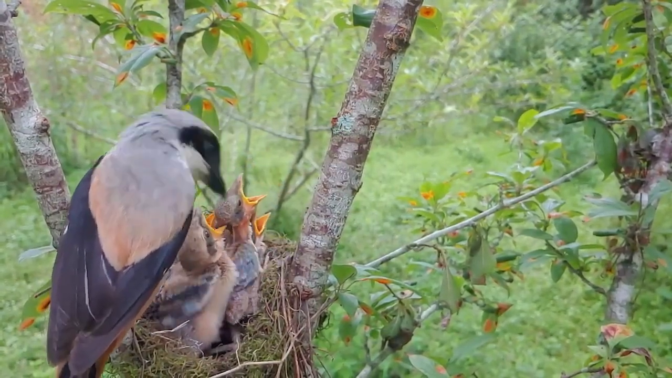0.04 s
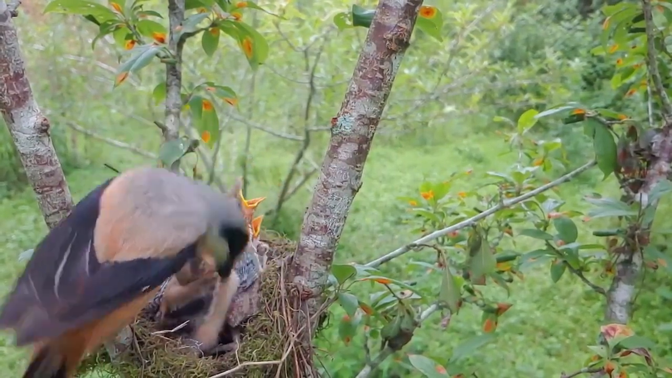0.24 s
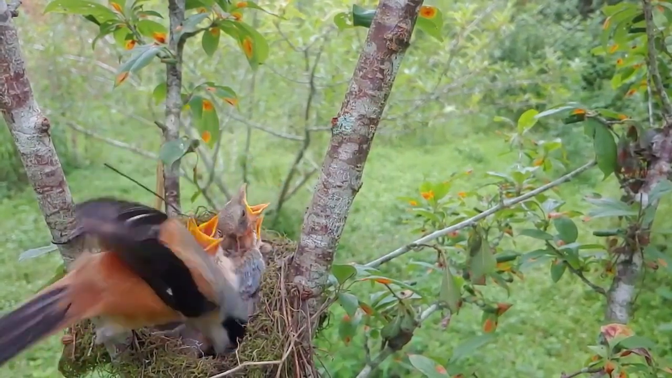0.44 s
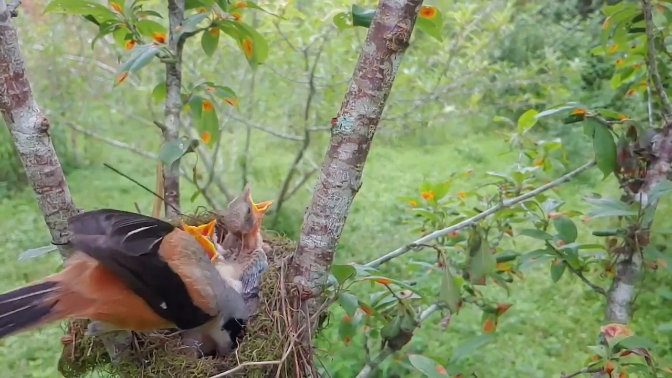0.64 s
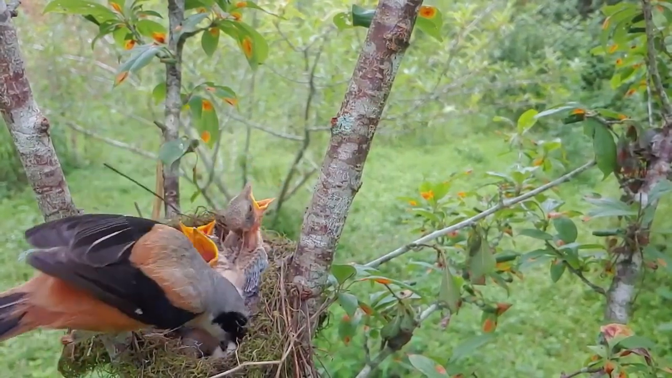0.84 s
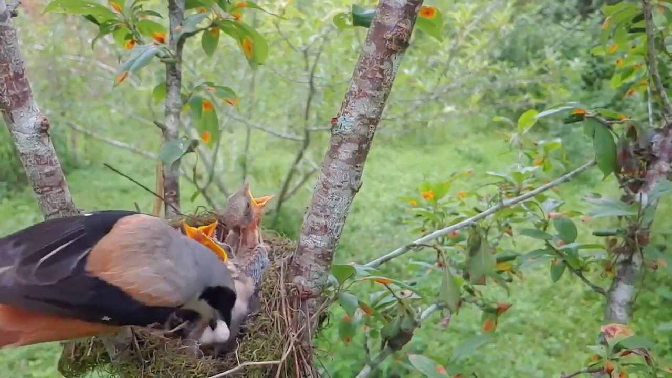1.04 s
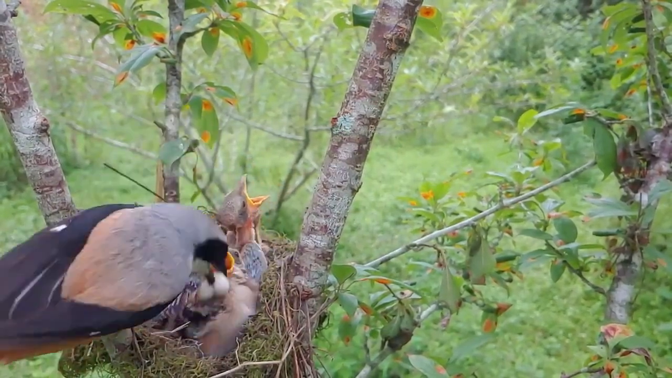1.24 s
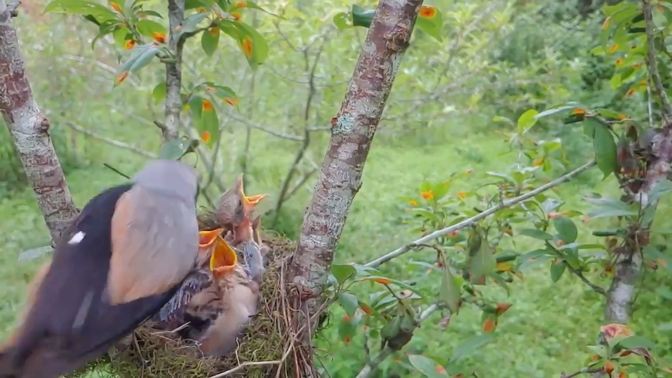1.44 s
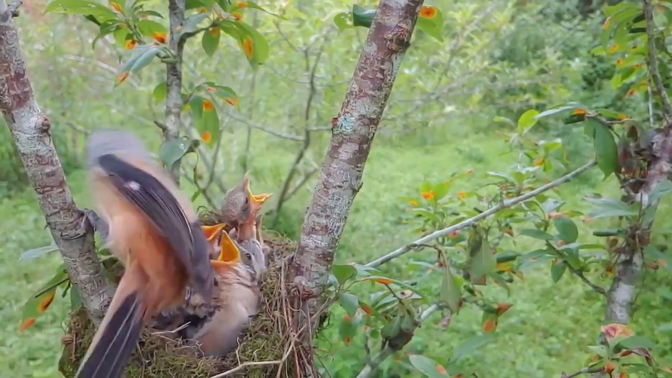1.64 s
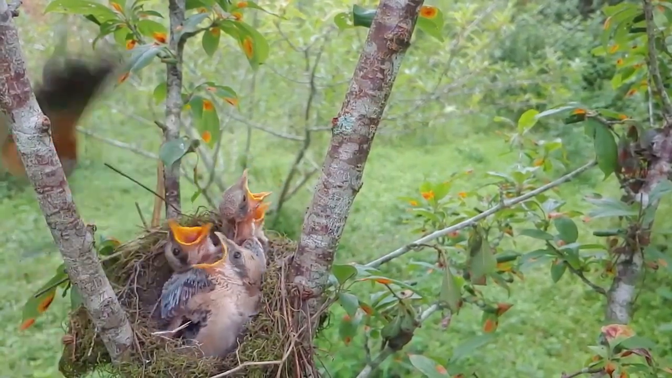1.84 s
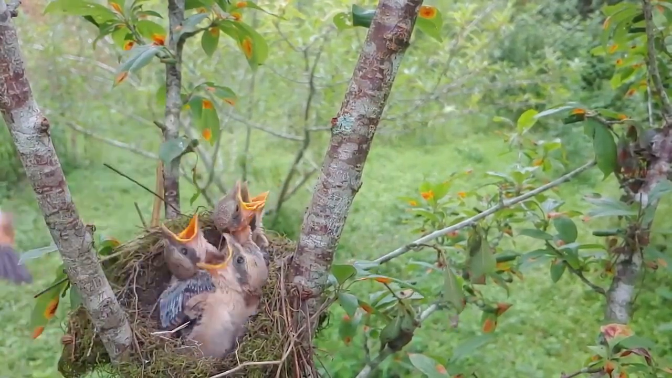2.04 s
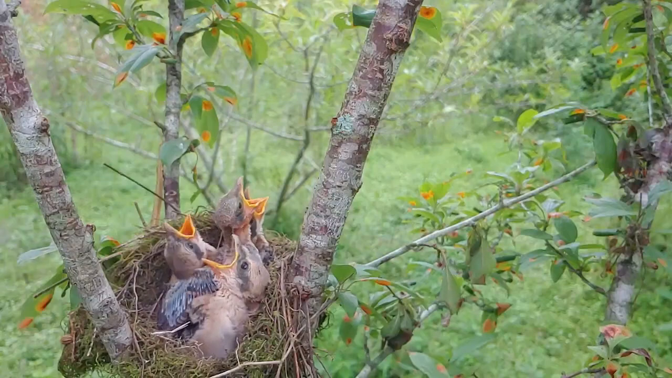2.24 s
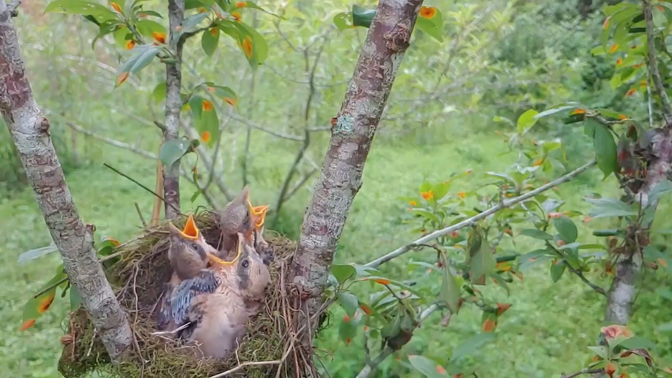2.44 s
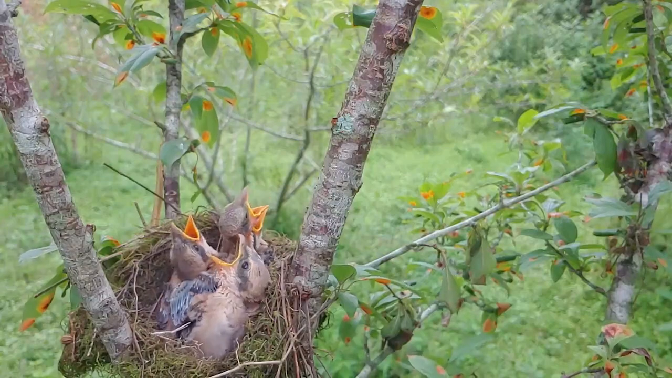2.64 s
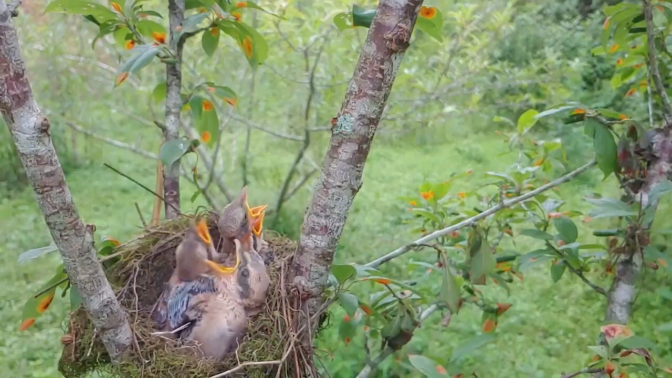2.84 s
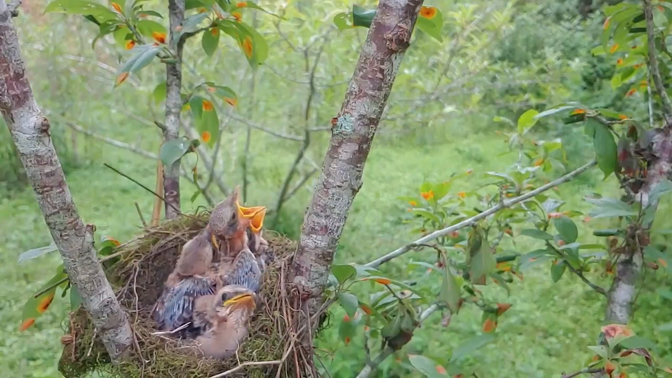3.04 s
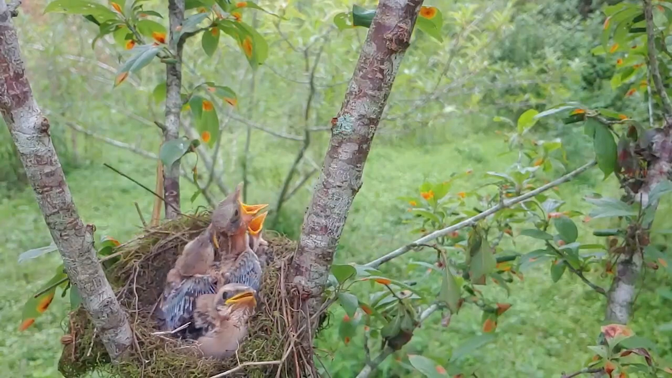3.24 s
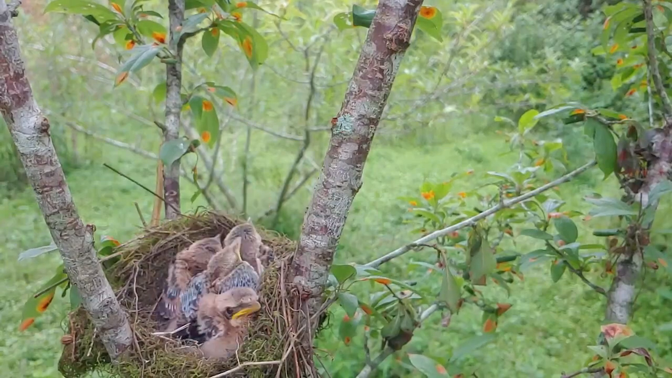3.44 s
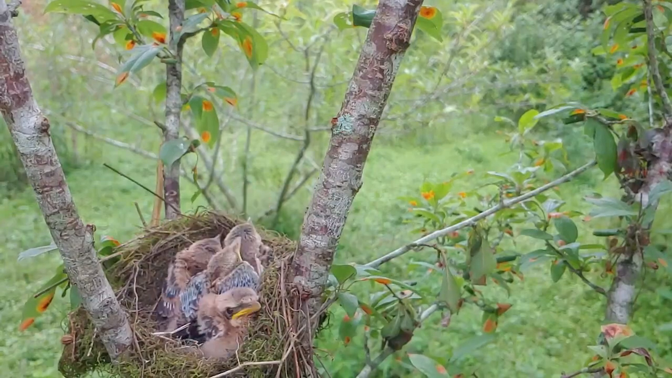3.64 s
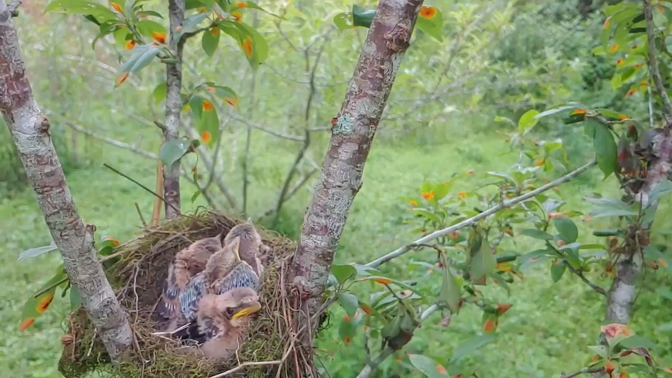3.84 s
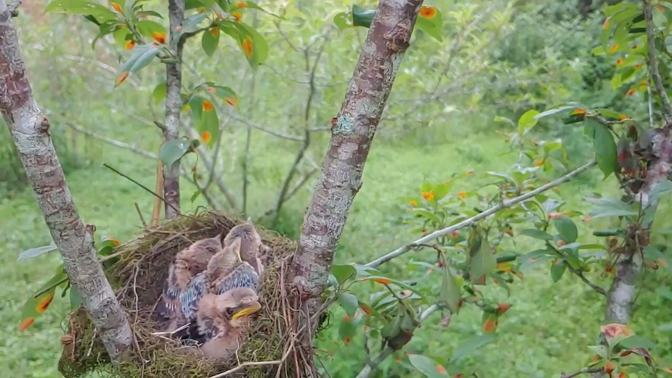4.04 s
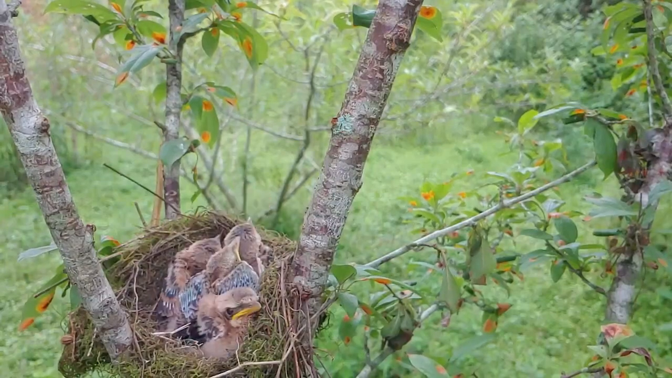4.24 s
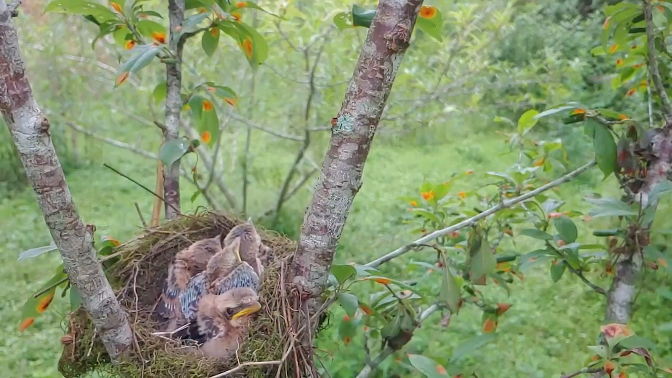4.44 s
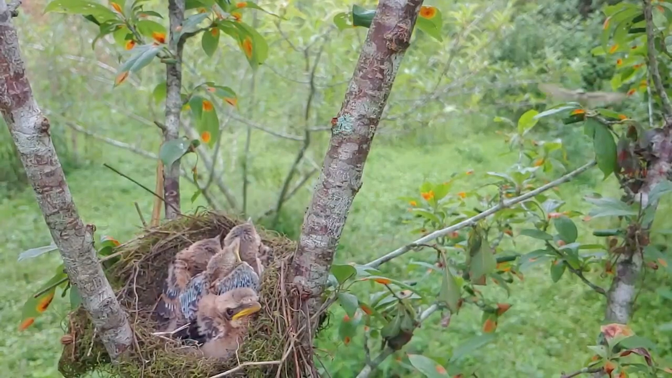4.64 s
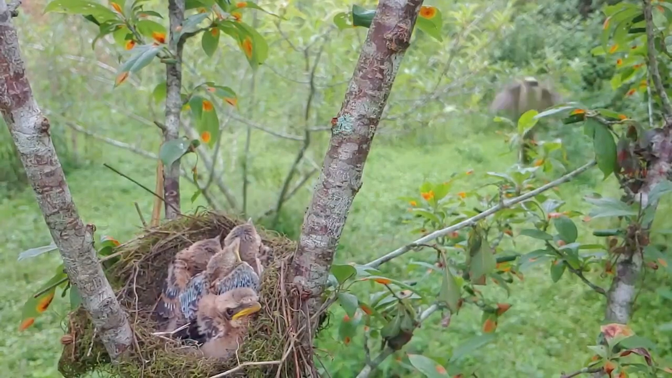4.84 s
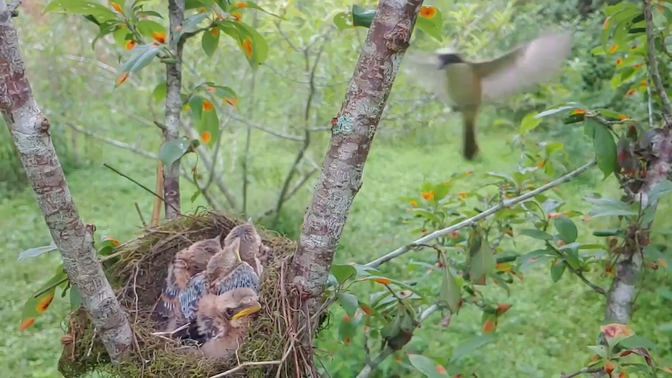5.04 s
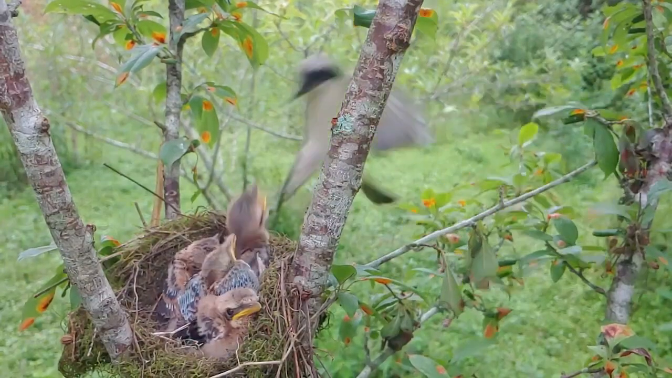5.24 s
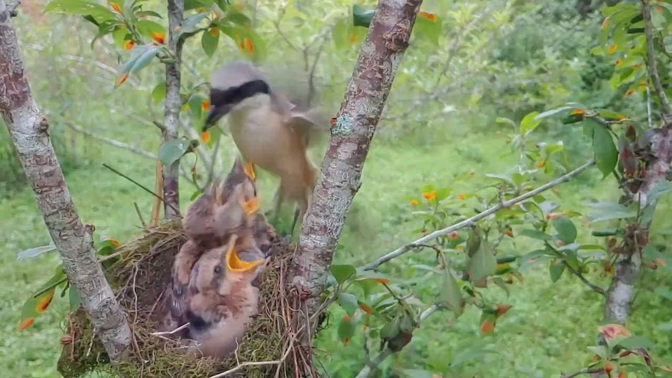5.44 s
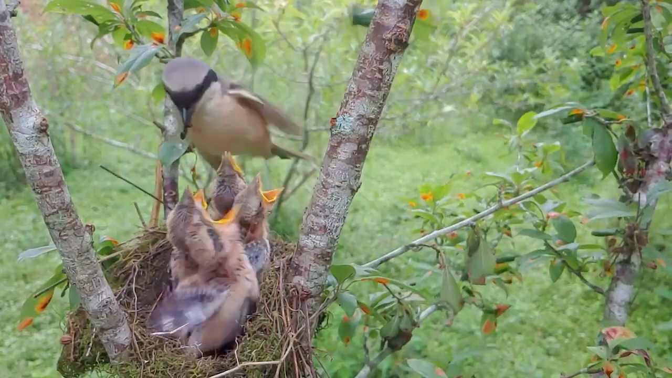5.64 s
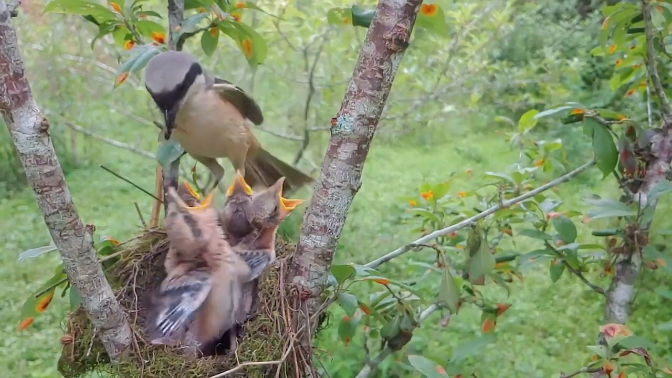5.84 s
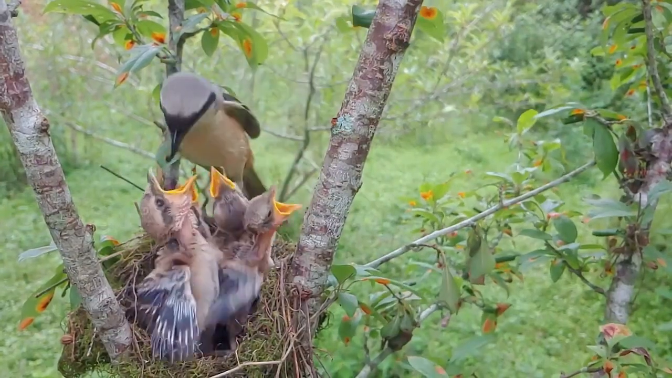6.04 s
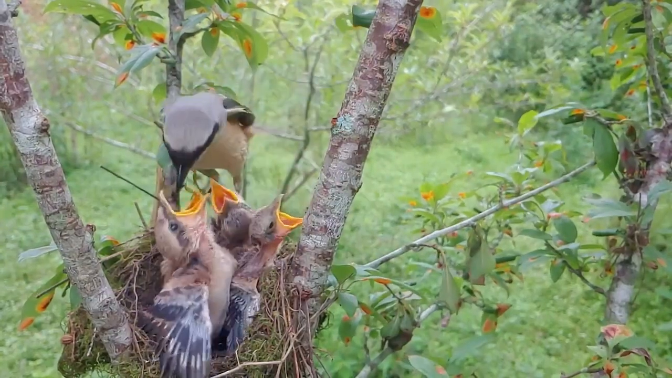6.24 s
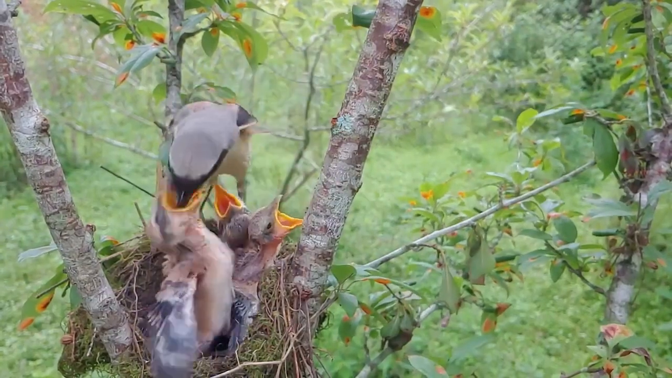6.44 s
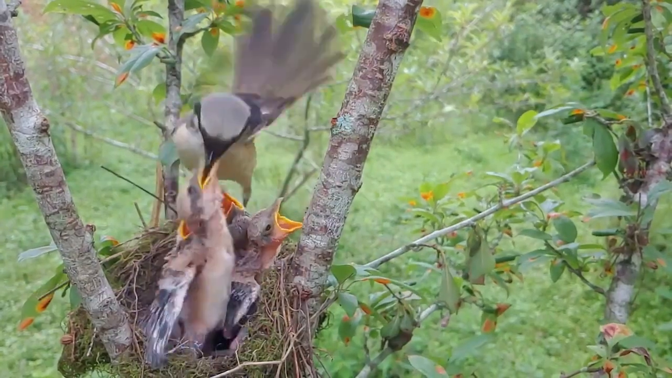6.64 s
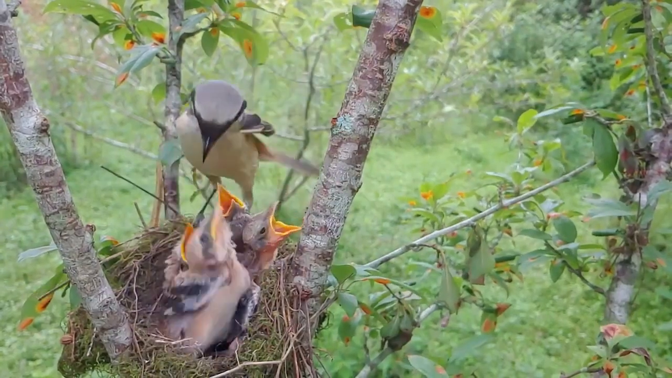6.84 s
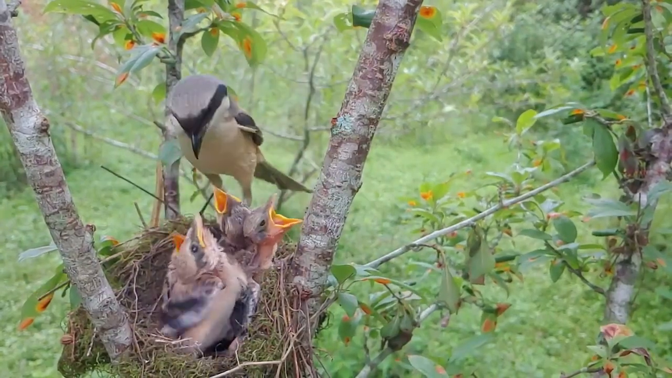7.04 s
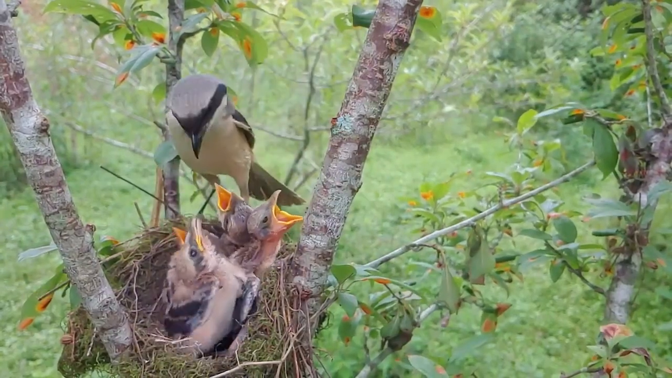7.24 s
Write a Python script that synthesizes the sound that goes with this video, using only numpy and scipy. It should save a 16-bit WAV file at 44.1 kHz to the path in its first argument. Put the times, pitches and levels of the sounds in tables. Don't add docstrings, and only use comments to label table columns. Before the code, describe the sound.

Close overlapping chick begging, squeaky and breathy, falls silent over faint chirring insects, then restarts more eagerly after a soft flapping landing.

```python
import sys
import numpy as np
from scipy import signal
from scipy.fft import rfft, irfft, next_fast_len
from scipy.io import wavfile
from scipy.ndimage import uniform_filter1d, map_coordinates

SR = 44100
rng = np.random.default_rng(int(sys.argv[2]) if len(sys.argv) > 2 else 0)


def dump_mix(stems):
    frames = np.atleast_2d(stems).T
    limited = np.clip(frames, -1, 1)
    pcm = np.round(limited * 32767).astype(np.int16)
    wavfile.write(sys.argv[1], SR, pcm)


def linear_from_db(decibels):
    return 10 ** (np.asarray(decibels, float) / 20)


N = 321930

# frequency in Hz, density in dB per Hz.
AIR_HZ_DB = [(20, -10), (59, -8), (598, -18), (1770, -27.5), (4700, -22.5), (5900, -17), (9500, -17),
             (11500, -15.5), (12500, -28)]
# frequency in Hz, likeness from 0 to 1.
AIR_ALIKE = [(30, .55), (300, .36), (2000, .2), (8000, .15)]
# start in seconds, length in seconds, start pitch in Hz, end pitch in Hz, level in dB.
FAR_BIRDS = [(3.56, 0.086, 4450, 4550, -70), (3.87, 0.027, 3140, 2820, -66), (4.09, .014, 3320, 2700, -68),
             (4.138, 0.02, 2710, 3270, -64), (4.18, .026, 3150, 3160, -64), (4.268, 0.022, 3200, 2800, -61),
             (4.312, 0.022, 2980, 2850, -66), (4.335, .01, 2950, 3400, -64),
             (4.458, 0.012, 2880, 3250, -62), (4.465, 0.021, 3440, 2930, -55.5),
             (4.495, 0.044, 3020, 3200, -60), (4.508, .012, 2500, 3000, -65), (4.55, 0.03, 3270, 2870, -64),
             (4.785, .08, 2690, 3300, -61), (4.87, 0.078, 3300, 2710, -62.5),
             (5.342, 0.022, 2640, 3150, -64), (5.368, 0.025, 3170, 3000, -62),
             (5.4, 0.012, 3180, 2740, -57), (5.53, .014, 2960, 3420, -67), (5.545, 0.014, 3330, 2700, -64)]
# time in seconds, level in dB.
CHIRR_S_DB = [
    (0.0, -53.5),
    (2.79, -54),
    (4.19, -55),
    (7.3, -51.5),
]
# start in seconds, number of chirps.
TRILLS = [
    (3.6, 8),
    (4.97, 5),
]
# start in seconds, stop in seconds, last level in dB.
DRONE = [
    (1.25, 1.45, -67),
    (1.8, 2.0, -68),
    (4.97, 5.9, -60.5),
]
# time in seconds, wing rate in Hz, level in dB.
FLY = [
    (4.15, 155, -100),
    (4.35, 159.8, -72.5),
    (4.9, 146, -79),
    (7.3, 151.9, -73),
]
# time in seconds, beat level in dB.
TAKE_OFF_S_DB = [
    (2.064, -47.5),
    (2.118, -37.5),
    (2.3, -45.5),
    (2.7, -53.5),
    (3.38, -58.5),
]
# time in seconds, push level in dB, feather level over the push in dB.
LANDING = [(5.03, -55.5, -32), (5.137, -51, -30), (5.21, -66, -34), (5.274, -54.5, -7), (5.33, -51, -8),
           (5.377, -44.5, -12), (5.43, -47, -6), (5.581, -46, 2.5), (5.634, -45.5, -8), (5.702, -47, 7.5),
           (5.762, -47, 4)]
# frequency in Hz, level in dB.
PUSH_HZ_DB = [(20, -12), (50, 0), (130, -2), (300, -9), (700, -22), (1500, -50)]
# frequency in Hz, level in dB.
FEATHER_HZ_DB = [(60, -62), (200, -3), (900, -10), (2500, -26), (12000, -9.5)]
# time in seconds, peak level in dB, pitch in Hz.
GULPS = [(0.021, -44, 1226), (0.268, -47, 1300), (0.49, -45.5, 1250), (0.693, -43.5, 1238),
         (0.932, -45.5, 1250), (1.183, -50.5, 1270), (1.431, -47.5, 1135), (1.699, -53.5, 1210),
         (1.968, -46, 1190), (2.172, -55, 804), (2.222, -43.5, 1313), (2.419, -41.5, 1300),
         (2.673, -43.5, 1243), (2.898, -44.5, 1236), (3.146, -45, 1263), (3.369, -41.5, 1184),
         (6.085, -46, 1228), (6.385, -52.5, 830), (6.415, -47, 1302), (6.454, -51.5, 926),
         (6.801, -41, 1305), (6.944, -45.5, 1300), (7.049, -41, 1362), (7.139, -39, 1266),
         (7.177, -56.5, 796)]
# multiple of the pitch, level in dB.
GULP_TONES = [(1, 3.5), (2, -4), (3, 1), (4, -5), (5, -3.5)]
# start in seconds, stop in seconds.
BEGGING_S = [
    (0, 3.4),
    (5.5, 7.3),
]
# start in seconds, length in seconds, start Hz, end Hz, level in dB.
UPPER = [(0, .1, 6500, 4500, -52), (.14, .02, 5900, 5900, -50), (.38, .045, 5950, 5500, -49),
         (.41, .11, 6850, 5450, -52), (.6, .055, 5900, 5400, -51), (.7, .062, 6750, 6650, -52),
         (.82, .08, 6100, 5330, -49), (1.56, .065, 6200, 5600, -53), (1.125, .07, 6000, 4600, -55),
         (1.22, .155, 6540, 4600, -49), (2.36, .05, 5900, 6150, -54), (1.462, .045, 6950, 6500, -53),
         (1.715, .14, 6700, 4900, -51), (1.84, .11, 6050, 4750, -48), (1.956, .097, 6250, 5100, -48),
         (2.086, .07, 5950, 5000, -48), (2.25, .12, 6100, 5000, -50), (2.47, .066, 6200, 5400, -48),
         (2.553, .045, 5930, 5200, -54), (2.911, .09, 6200, 5150, -49), (3.125, .105, 6750, 5500, -52)]
# start in seconds, length in seconds, start Hz, end Hz, level in dB.
LOWER = [(.03, .07, 5000, 3950, -52), (.53, .07, 4400, 4600, -53), (.51, .075, 5450, 5450, -51),
         (.75, .065, 5300, 4500, -53), (1.005, .125, 5100, 3900, -53), (.235, .03, 3800, 3350, -52),
         (.66, .03, 3750, 3250, -51), (2.38, .035, 2950, 3200, -51), (1.47, .15, 5400, 3900, -50),
         (1.66, .036, 3350, 2900, -49), (1.72, .13, 5200, 3800, -51), (1.97, .08, 4700, 5000, -54),
         (2.045, .082, 5850, 4750, -52), (2.203, .018, 3550, 3100, -49), (2.215, .07, 5530, 4590, -48),
         (2.61, .057, 4080, 3120, -52), (2.815, .055, 5450, 4700, -52), (3.07, .05, 5750, 5150, -51),
         (3.13, .085, 5250, 4650, -52), (3.225, .1, 4950, 4650, -49), (3.273, .055, 5650, 5400, -51),
         (3.346, .052, 4800, 4670, -47)]
# start in seconds, length in seconds, start Hz, end Hz, level in dB.
EAGER = [(5.55, .06, 5850, 5600, -56), (5.63, .085, 5100, 4700, -55), (5.855, .09, 6850, 6200, -55),
         (5.87, .1, 5400, 4540, -48), (6.03, .035, 4900, 4100, -49), (6.0, .055, 5800, 5020, -48),
         (6.05, .04, 3500, 2500, -52), (6.173, .016, 4900, 4200, -45), (6.215, .04, 6700, 6000, -52),
         (6.255, .095, 5230, 5100, -46), (6.25, .16, 1400, 2050, -62), (6.271, .034, 4340, 3590, -47),
         (6.35, .06, 5300, 4650, -44), (6.367, .044, 4000, 2950, -46), (6.385, .063, 5500, 4750, -46),
         (6.558, .022, 4750, 5280, -46), (6.778, .034, 1680, 1400, -50), (6.793, .019, 4680, 4650, -42),
         (6.9, .045, 2250, 1300, -56), (7.018, .035, 3400, 3000, -49), (7.022, .022, 6800, 6700, -51),
         (7.262, .035, 3750, 2500, -50)]
# start in seconds, length in seconds, top Hz, end Hz, level in dB.
ARCHES = [(1.0, .1, 5950, 5600, -47), (1.218, .14, 4950, 3850, -52), (1.305, .075, 6050, 5170, -49),
          (5.735, .11, 5750, 5000, -54), (6.525, .06, 5900, 5000, -44), (6.62, .062, 5750, 4950, -53),
          (6.7, .085, 5850, 5400, -47), (6.945, .07, 5900, 5650, -47), (7.165, .075, 5800, 5400, -48)]
PERCHED_S = [1.0, 6.945]
# start in seconds, length in seconds, start Hz, end Hz,
# level in dB.
STROKES = [(0.0, 0.014, 3480, 3450, -54), (0.07, 0.016, 4830, 4650, -52), (0.082, 0.024, 2910, 2800, -54),
           (0.154, 0.04, 5930, 5800, -49), (0.19, 0.07, 6600, 6300, -57), (0.299, 0.036, 3050, 3000, -51),
           (0.475, 0.045, 4800, 4550, -54), (0.585, 0.03, 5300, 4300, -55), (0.637, 0.022, 2410, 2830, -56),
           (0.765, 0.045, 6550, 5600, -51), (0.82, 0.052, 4750, 4500, -53), (0.816, 0.014, 5710, 5740, -49),
           (0.838, 0.032, 6030, 5880, -48), (0.872, 0.026, 5700, 5320, -50),
           (0.912, 0.016, 3400, 3270, -51), (1.105, 0.034, 5530, 5880, -51),
           (1.395, 0.022, 3750, 3420, -53), (1.413, 0.014, 3150, 2930, -52), (1.471, 0.02, 5570, 5520, -50),
           (1.519, 0.09, 6690, 4800, -53), (1.624, 0.024, 4170, 3540, -53), (1.652, 0.098, 5760, 5670, -49),
           (1.868, 0.02, 5750, 4800, -52), (1.86, 0.016, 2690, 2420, -50), (1.932, 0.03, 3360, 2930, -50),
           (2.107, 0.02, 5100, 4690, -52), (2.183, 0.02, 2850, 3500, -52), (2.135, 0.02, 2250, 3200, -52),
           (2.371, 0.028, 3800, 3440, -55), (2.373, 0.016, 5760, 5640, -51),
           (2.415, 0.016, 3920, 3950, -47), (2.52, 0.014, 5420, 5420, -52), (2.624, 0.02, 2780, 3090, -55),
           (2.682, 0.066, 5790, 5740, -49), (3.123, 0.02, 3650, 3110, -50), (3.219, 0.018, 4690, 4510, -48),
           (3.235, 0.034, 2790, 2600, -50)]
# start in seconds, length in seconds, start Hz, end Hz, level in dB.
EAGER_STROKES = [(5.705, 0.03, 4530, 4650, -53), (5.741, 0.018, 5470, 5800, -55),
                 (5.771, 0.016, 4000, 3570, -54), (5.825, 0.014, 5830, 5430, -55),
                 (5.921, 0.018, 2580, 2460, -59), (5.929, 0.026, 4350, 4160, -51),
                 (5.962, 0.022, 5970, 5770, -56), (5.98, 0.054, 4920, 4890, -48),
                 (5.994, 0.026, 3010, 3230, -56), (6.0, 0.06, 1600, 2200, -64),
                 (6.04, 0.016, 2980, 2920, -53), (6.082, 0.024, 4630, 4700, -53),
                 (6.1, 0.022, 4450, 4320, -50), (6.128, 0.016, 5090, 5240, -55),
                 (6.144, 0.022, 5000, 5040, -51), (6.164, 0.014, 4740, 5010, -48),
                 (6.184, 0.036, 5340, 5600, -57), (6.228, 0.014, 4440, 4580, -50),
                 (6.364, 0.024, 4750, 4200, -48), (6.387, 0.022, 6720, 6680, -56),
                 (6.645, 0.045, 6400, 5200, -54), (6.471, 0.036, 5830, 5490, -54),
                 (6.587, 0.018, 5030, 4740, -53), (6.812, 0.038, 1370, 1280, -52),
                 (6.836, 0.018, 4640, 4330, -52), (6.852, 0.018, 4070, 3930, -52),
                 (6.878, 0.032, 4390, 4850, -53), (6.812, 0.04, 2750, 2550, -56),
                 (6.91, 0.026, 4150, 4190, -50), (6.996, 0.014, 3730, 3880, -53),
                 (7.115, 0.02, 1200, 1600, -58), (7.146, 0.018, 4650, 4180, -53),
                 (7.265, 0.016, 5240, 5470, -58)]
# start in seconds, length in seconds, start Hz, end Hz, level in dB.
LEGS = [(.2, .04, 5500, 5000, -54), (.235, .05, 5250, 4700, -54), (.875, .015, 4500, 3700, -50),
        (.972, .03, 6250, 6650, -52), (1.458, .014, 4500, 5400, -54), (2.745, .025, 5600, 5000, -54),
        (3.118, .01, 5900, 6650, -48), (3.235, .02, 4400, 3400, -51), (5.805, .02, 5900, 5200, -52),
        (5.82, .02, 3500, 2750, -54), (6.5, .026, 4500, 5850, -50), (6.575, .022, 5000, 3400, -53),
        (6.607, .014, 4300, 5700, -55), (6.68, .025, 4900, 2900, -51), (6.772, .025, 5400, 2900, -51),
        (6.81, .025, 6300, 4650, -52), (6.922, .022, 5500, 6300, -49), (7.0, .016, 2900, 3300, -54),
        (7.135, .007, 2750, 2850, -44), (7.153, .02, 3000, 5600, -56), (7.1, .03, 4700, 5100, -52),
        (7.272, .012, 6700, 6750, -50)]
# end in seconds, level in dB.
SQUEAKS_S_DB = [(.103, -54), (.334, -50), (.623, -49), (.896, -49), (1.14, -49), (1.373, -50), (1.626, -50),
                (1.875, -58), (2.155, -60), (2.59, -60), (2.83, -55), (3.068, -56), (3.267, -52)]
# end in seconds, level in dB.
HOOKS_S_DB = [(5.62, -64), (5.795, -56), (5.975, -55), (6.137, -49), (6.296, -48.5), (6.463, -44.5),
              (6.634, -50), (6.79, -54), (6.954, -47.5), (7.123, -50), (7.3, -73)]
# frequency in Hz, level in dB.
BREATH_HZ_DB = [(2000, -46), (3000, -20), (4400, -17), (5500, -6), (6800, -17.5), (10500, -13.5),
                (12000, -54)]
# frequency in Hz, level in dB.
RASP_HZ_DB = [(600, -19.5), (1200, -10.5), (2200, -10.5), (3000, -4), (5000, -7.5), (6500, -14), (7500, -7),
              (10500, -12.5)]
# frequency in Hz, gain in dB.
MIC_HZ_DB = [(7000, 0), (7450, -16), (10000, -18), (11500, -30), (13000, -40)]

SAG_HALFWAY = .32
FIRST_STOP_S, SECOND_START_S = BEGGING_S[0][1], BEGGING_S[1][0]


def unit(x):
    return x / np.sqrt(np.mean(x ** 2) + 1e-20)


def along(points, hz):
    f, v = np.transpose(points)
    return np.interp(np.log(hz + 1), np.log(f + 1), v)


def curves(rows):
    s, *cols = np.transpose(rows)
    return [np.interp(np.arange(N) / SR, s, c, left=c[0], right=c[-1]) for c in cols]


def wobble(rate_hz, count=N):
    knots = rng.standard_normal(int(count * rate_hz / SR) + 4)
    return map_coordinates(knots, [np.arange(count) * rate_hz / SR])


def filtered(x, response):
    m = next_fast_len(N + 8192)
    return irfft(rfft(x, m) * response(np.fft.rfftfreq(m, 1 / SR)), m)[..., :N]


def rush(spectrum, alike, patchy_db):
    z = signal.stft(rng.standard_normal((2, N)), nperseg=256)[2]
    field = uniform_filter1d(rng.standard_normal(z.shape[1:]), 4, 0)
    field = uniform_filter1d(field, 6, 1)
    pair = signal.istft(z * linear_from_db(patchy_db * unit(field)), nperseg=256)[1][:, :N]

    def mid_side(hz):
        turn = np.arccos(np.clip(along(alike, hz), -1, 1)) / 2
        return linear_from_db(along(spectrum, hz)) * [np.cos(turn), np.sin(turn)]

    mid, side = filtered(pair, mid_side)
    return unit(np.array([mid + side, mid - side]))


def add(track, s, sound):
    part = track[..., max(round(s * SR), 0):][..., :sound.shape[-1]]
    part += sound[..., :part.shape[-1]]


def sagging(rows, halfway):
    return [(s, length, a, a + halfway * (b - a), b, db) for s, length, a, b, db in rows]


def glides(rows, quaver_hz, rough_db, pan_db, spread_db, lag, scoop_hz=0, fade_db_per_s=0):
    out, edge_s = np.zeros((2, N)), .004
    quaver = quaver_hz * (wobble(180, count=SR) + 1.475 * wobble(55, count=SR))
    rough = linear_from_db(rough_db * (wobble(400, count=SR) + 0.11 * wobble(46.8, count=SR)))
    for (s, length, *pitch_hz, db), (a, b, c) in zip(rows, rng.standard_normal((len(rows), 3))):
        t = np.arange(round((length + 2 * edge_s) * SR)) / SR
        pick = (round(abs(c) * SR) + np.arange(len(t))) % SR
        bend = np.polyfit([0, .5, 1], pitch_hz, deg=2)
        hz = np.polyval(bend, (t - edge_s) / length) + quaver[pick]
        hz = hz - scoop_hz * pitch_hz[0] / 6000 * np.exp(-t / .0045)
        phase = 2 * np.pi * np.cumsum(hz) / SR
        edges = np.clip(np.minimum(t, t[-1] - t) / (2 * edge_s), 0, 1)
        gain = linear_from_db(db - fade_db_per_s * (t - length / 2)) * rough[pick] * edges
        side = linear_from_db((pan_db + spread_db * a) / 2)
        ear_lag = lag * b * pitch_hz[1] / 5000
        add(out, s - edge_s, gain * np.array([side * np.sin(phase), np.sin(phase + ear_lag) / side]))
    return out


def foliage(x, t60_s, wet_db):
    t = np.arange(SR // 4) / SR
    tail = rng.standard_normal((2, len(t))) * linear_from_db(-60 * t / t60_s)
    return x + linear_from_db(wet_db) * signal.fftconvolve(x, tail / np.linalg.norm(tail[0]), axes=1)[:, :N]


def air():
    return linear_from_db(-57.5) * rush(AIR_HZ_DB, AIR_ALIKE, patchy_db=.8)


def far_birds():
    rows = sagging(FAR_BIRDS, .52)
    calls = glides(rows, quaver_hz=28, rough_db=3, pan_db=-0.5, spread_db=1, lag=0.5)
    return foliage(calls, t60_s=0.12, wet_db=-7)


def chirr():
    out = np.zeros((2, N))
    for rate_hz, db, pan_db in [(48, 0, -4), (63, -2, 5), (42, -2, 2), (55, -2, -1)]:
        turn = np.cumsum(rate_hz * (1 + .06 * wobble(4))) / SR
        hz = 4400 - 1080 * (turn % 1) + 130 * wobble(250)
        stroke = np.sin(2 * np.pi * np.cumsum(hz) / SR) * np.abs(np.sin(np.pi * turn))
        swell_db = 3 * np.cos(2 * np.pi * turn / 3) + 1.5 * wobble(5) + 2.5 * wobble(120)
        out += stroke * linear_from_db(db + swell_db + pan_db * np.array([[.5], [-.5]]))
    blurred = foliage(out, t60_s=.1, wet_db=0)
    return linear_from_db(curves(CHIRR_S_DB)[0]) * np.array([unit(ear) for ear in blurred])


def cricket():
    chirp_s, stroke_s = .109, .0165
    rows = [(s + j * chirp_s + k * stroke_s, .004, 5400, 5100, 4850, -63)
            for s, count in TRILLS for j in range(count) for k in range(5)]
    strokes = glides(rows, quaver_hz=60, rough_db=1.5, pan_db=0, spread_db=0, lag=0)
    return foliage(strokes, t60_s=0.07, wet_db=6)


def steady_insect():
    gain, swell_db = np.zeros(N), 14
    for start, stop, db in DRONE:
        add(gain, start, linear_from_db(db - swell_db * np.linspace(1, 0, round((stop - start) * SR))))
    gain = uniform_filter1d(gain, size=3000)
    phase = 2 * np.pi * 2172 * np.arange(N) / SR + 0.52 * wobble(25)
    return gain * linear_from_db(1.5 * wobble(20)) * np.sin(phase + np.array([[0], [.6]]))


def fly():
    hz, db = curves(FLY)
    phase = 2 * np.pi * np.cumsum(hz * (1 + .025 * wobble(7) + .035 * wobble(40))) / SR
    tones = [(1, 0.0), (2, 4.5), (3, -3.0), (4, -3.5)]  # multiple, dB
    return linear_from_db(db) * sum(linear_from_db(g + 2 * wobble(3.12)) * np.sin(k * phase) for k, g in tones)


def wings():
    push, rustle, t = np.zeros(N), np.zeros(N), np.arange(round(.06 * SR)) / SR
    swing = 2 * np.pi * np.cumsum(36 + 150 * np.exp(-t / .012)) / SR
    push_shape = np.sin(swing) * (t / 0.014) * np.exp(1 - t / 0.015)
    rustle_shape = (t / 0.0029) * np.exp(1 - t / 0.0068)
    s, db = np.transpose(TAKE_OFF_S_DB)
    take_off = [(b, np.interp(b, s, db), -16) for b in np.arange(s[0], s[-1], .0599)]
    for b, db, feather_db in take_off + LANDING:
        add(push, b - .016, linear_from_db(db) * push_shape)
        lead_s = 0.0076 * (1 + (b < FIRST_STOP_S))
        add(rustle, b - lead_s, linear_from_db(db + feather_db) * rustle_shape)
    effort = np.abs(uniform_filter1d(np.abs(push), size=900))
    gust = effort * rush(PUSH_HZ_DB, [(50, .3)], patchy_db=0)
    feathers = rustle * linear_from_db(6.3 * wobble(600)) * rush(FEATHER_HZ_DB, [(500, 0.86)], patchy_db=0.0)
    return .7 * push + .4 * gust + 0.61 * feathers


def gulps():
    out, t = np.zeros(N), np.arange(round(0.018 * SR)) / SR
    shape = np.sin(np.pi * (t / t[-1]) ** 0.78) ** 2
    snap = np.clip((t - .003) / .001, 0, 1) * linear_from_db(2 - 1900 * np.abs(t - .0045))
    for s, db, hz in GULPS:
        phase = 2 * np.pi * hz * np.cumsum(1.15 - 19 * t) / SR
        stack = sum(linear_from_db(g + rng.normal(0, 1.0)) * (shape if k == 1 else snap) * np.cos(k * phase)
                    for k, g in GULP_TONES)
        add(out, s - .005, linear_from_db(db) * stack)
    drops = [(s - .034, .03, 3750, 3450, 2950, min(db - 1, -51))
             for s, db, hz in GULPS if .1 < s < FIRST_STOP_S]
    return out + glides(drops, quaver_hz=67, rough_db=4, pan_db=1.5, spread_db=1, lag=0.2)


def front_calls():
    arches = [(s, length, top + (500 if s in PERCHED_S else -250), top, end, db)
              for s, length, top, end, db in ARCHES]
    return sagging(UPPER + LOWER + EAGER, SAG_HALFWAY) + arches


def clear_voices(calls):
    out = linear_from_db(2.5) * glides(calls, quaver_hz=40, rough_db=2.2, pan_db=3.3, spread_db=1.2, lag=1.1,
                            scoop_hz=800, fade_db_per_s=25)
    short = sagging(STROKES + EAGER_STROKES + LEGS, .45)
    return out + linear_from_db(2) * glides(short, quaver_hz=50, rough_db=2.5, pan_db=2.5, spread_db=1.5, lag=.75)


def second_voices(calls):
    high = np.array([row for row in calls if row[3] > 4300])
    shift_hz, late = rng.standard_normal((len(high), 2)).T
    shift_hz = -950 + 450 * shift_hz
    none = 0 * late
    rows = high + np.transpose([.015 * late, .012 + none, shift_hz, shift_hz, shift_hz - 250, none])
    return linear_from_db(-6) * glides(rows, quaver_hz=70, rough_db=3, pan_db=2.5, spread_db=3, lag=.8)


def crowd(effort):
    level_db = -58
    s, u, v, w = rng.random((110, 4)).T
    hz, fall_hz = 4300 + 2400 * u, 1600 * v
    rows = np.transpose([s * N / SR, .08 * (.5 + w), hz, hz - SAG_HALFWAY * fall_hz, hz - fall_hz,
                         level_db + 0 * s])
    follow = np.clip(effort / linear_from_db(level_db), 0, 1)
    return follow * glides(rows, quaver_hz=60, rough_db=2.5, pan_db=3, spread_db=2, lag=1, scoop_hz=800)


def breath(effort):
    eager = linear_from_db(3.5 * (np.arange(N) / SR > SECOND_START_S))
    noise = linear_from_db([[.3], [-.3]]) * rush(BREATH_HZ_DB, [(3000, 0.058)], patchy_db=5.5)
    return (linear_from_db(-4.0) * effort + linear_from_db(-82.0)) * eager * noise


def rasp():
    hoarse = np.zeros(N)
    early_gulps = [g for g in GULPS if g[0] < FIRST_STOP_S]
    for closes, length_s, db in [(SQUEAKS_S_DB, .13, -53), (HOOKS_S_DB, .12, -52.5), (early_gulps, .13, -60)]:
        for s, *_ in closes:
            add(hoarse, s - length_s, linear_from_db(db - 11.0 * np.linspace(1, 0, round(min(length_s, s) * SR))))
    s, u, v, w = rng.random((220, 4)).T
    hz, fall_hz = 2300 + 2000 * u, -200 + 1200 * v
    rows = np.transpose([s * N / SR, 0.0125 + 0.0184 * w, hz + fall_hz / 3, hz, hz - fall_hz / 2.47, 8 * v])
    tangle = unit(glides(rows, quaver_hz=90, rough_db=3.5, pan_db=1.5, spread_db=3, lag=.8))
    gain = uniform_filter1d(hoarse, size=400) + linear_from_db(-65.5)
    return gain * (linear_from_db(-4.0) * tangle + linear_from_db(2.5) * rush(RASP_HZ_DB, [(3000, 0.56)], patchy_db=3))


def breath_ends():
    squeak_s, hook_s, stem_s = .013, .022, .04
    rows = [(s - squeak_s, squeak_s, 3200, 3000, 2650, db + 6.5) for s, db in SQUEAKS_S_DB]
    rows += [(s - hook_s, hook_s, 2100, 2750, 2800, db) for s, db in HOOKS_S_DB]
    rows += [(s - hook_s - stem_s, stem_s, 2350, 2180, 2080, db - 8) for s, db in HOOKS_S_DB]
    return glides(rows, quaver_hz=45, rough_db=2, pan_db=0, spread_db=2, lag=0.5)


def chicks():
    calls = front_calls()
    clear = clear_voices(calls)
    effort = np.sqrt(np.abs(uniform_filter1d(np.mean(clear ** 2, axis=0), size=1500)))
    out = clear + second_voices(calls) + crowd(effort) + breath(effort) + rasp() + breath_ends()
    begging = np.zeros(N)
    for start, stop in BEGGING_S:
        begging[round(start * SR):round(stop * SR)] = 1
    return begging * foliage(out, t60_s=0.04, wet_db=-8)


def scene():
    insects = chirr() + cricket() + steady_insect() + fly()
    return air() + far_birds() + insects + wings() + gulps() + chicks()


def top_cut(x):
    return signal.sosfilt(signal.butter(12, 15500, fs=SR, output="sos"), x)


def record(dry):
    dull = filtered(dry, lambda hz: linear_from_db(along(MIC_HZ_DB, hz)))
    return top_cut(dull)


dry = scene()
out = record(dry)
dump_mix(out)
```